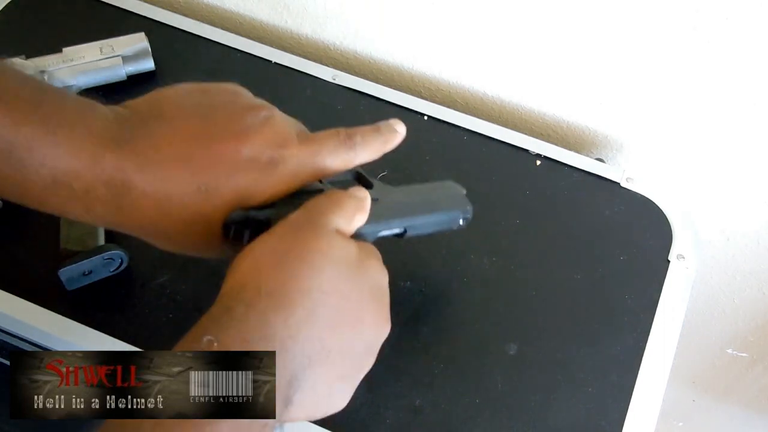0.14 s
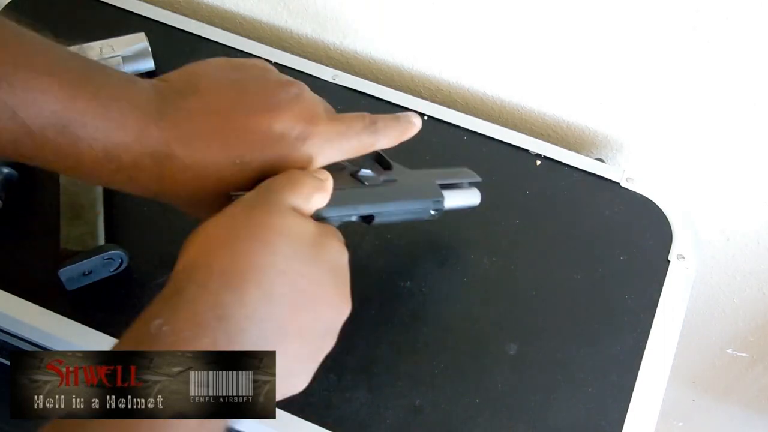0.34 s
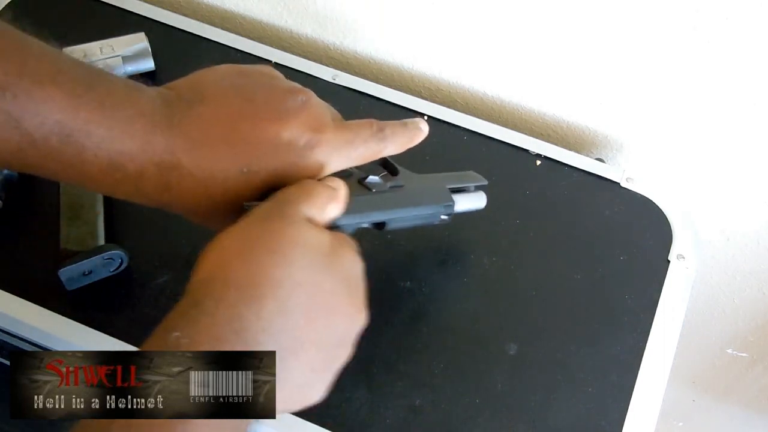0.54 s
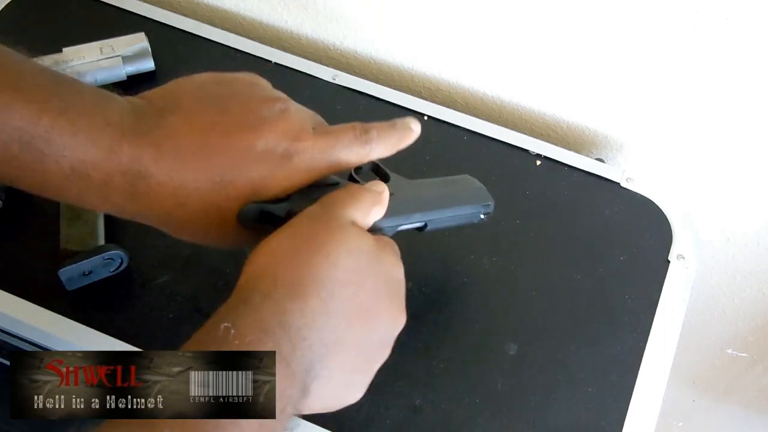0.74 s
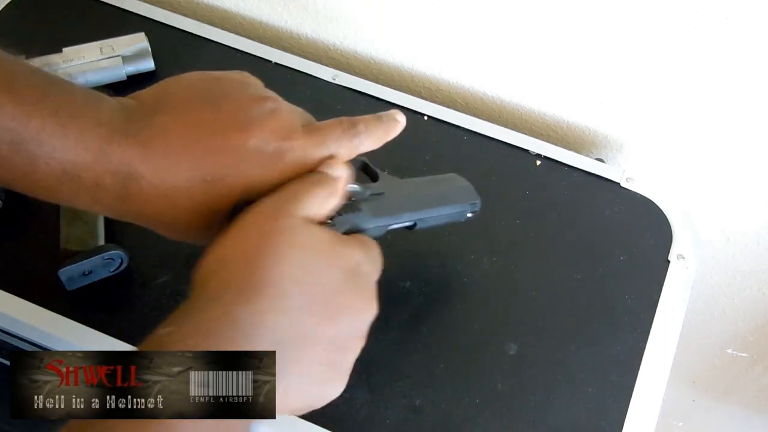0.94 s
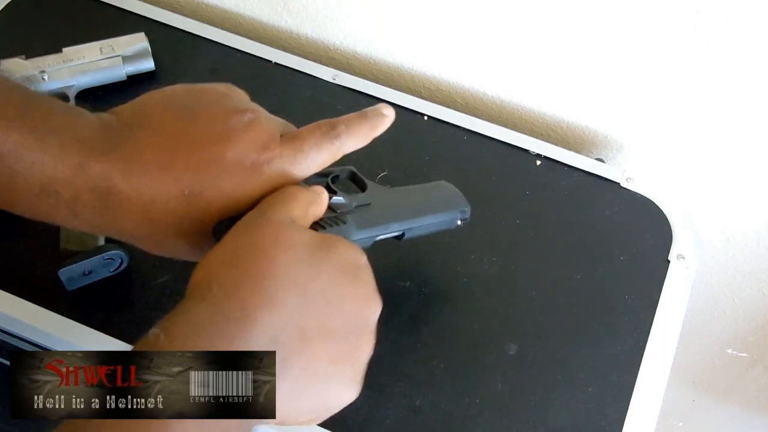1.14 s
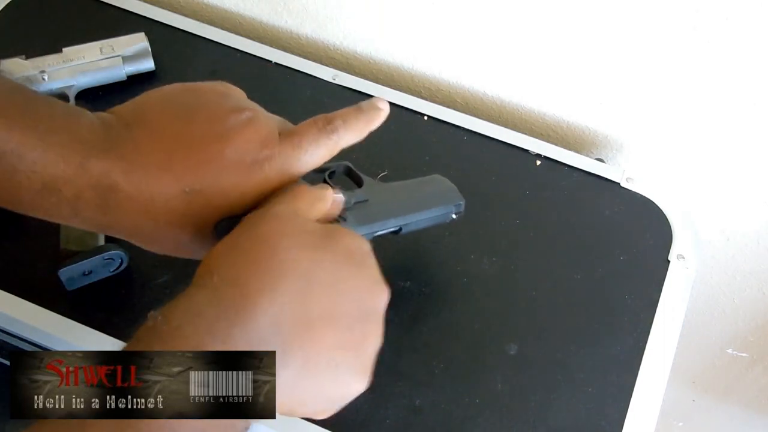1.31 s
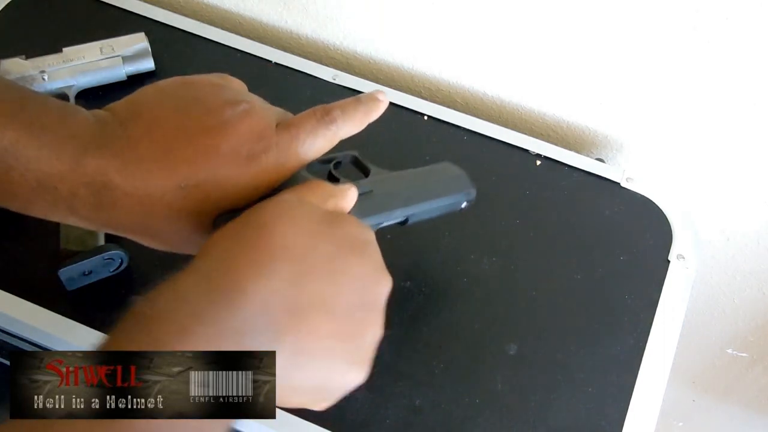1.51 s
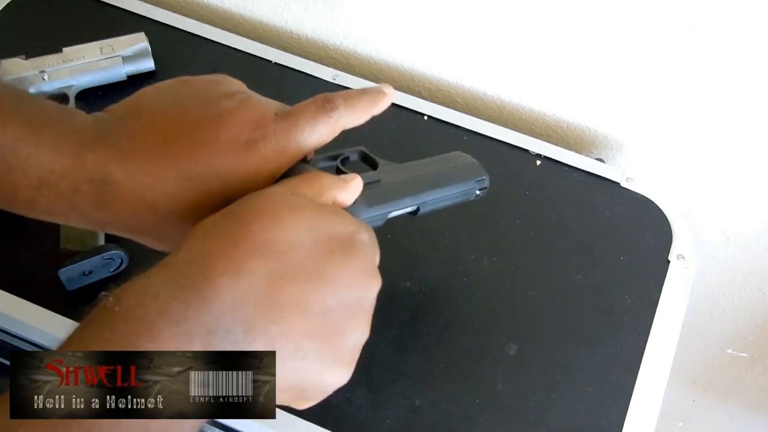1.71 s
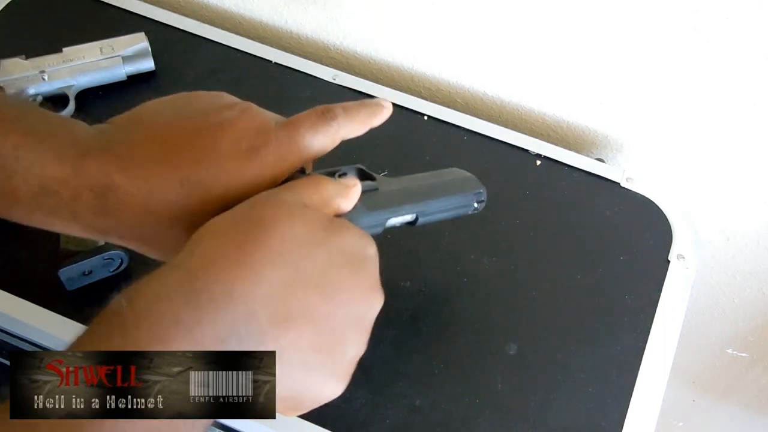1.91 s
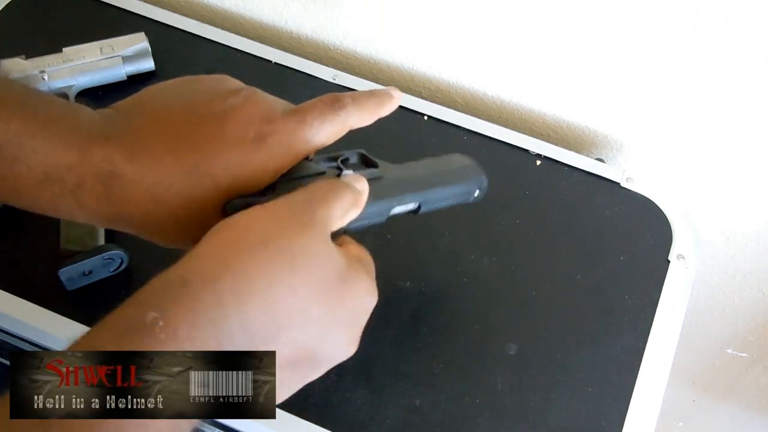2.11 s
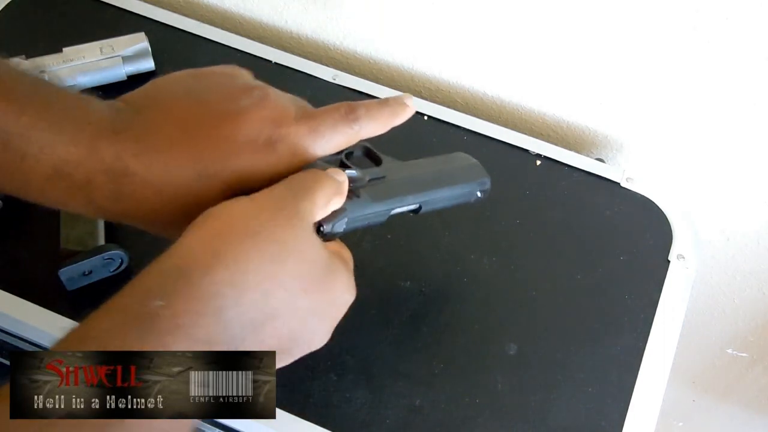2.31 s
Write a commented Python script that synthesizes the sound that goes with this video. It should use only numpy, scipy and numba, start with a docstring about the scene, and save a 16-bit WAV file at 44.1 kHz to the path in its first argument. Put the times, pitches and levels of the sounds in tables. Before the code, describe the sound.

A handgun slide is pulled back, caught and slammed home in bright steel clacks with brief scraping, then soft handling and light clicks, close to the microphone in a small live room with a low hum.

```python
"""A pistol slide is pulled back, caught and let fly home, heard close by in a small room over a low hum.
First come steel contacts, each a short crack that rings slide, spring and barrel; rails scrape in between.
The frame thuds in the hand under the hard blows, and the closing slide pushes a puff of air. Then the hold
shifts softly and light clicks follow, one leaving a faint ring. Reflections and a decaying tail form the
room; a limiter flattens the hard blows, so the room swells up behind them."""
import sys
import numpy as np
from scipy import signal
from scipy.fft import rfft, irfft, next_fast_len
from scipy.io import wavfile
from scipy.ndimage import uniform_filter1d
from numba import njit

SR = 44100
rng = np.random.default_rng(int(sys.argv[2]) if len(sys.argv) > 2 else 0)


def store_wav(level_fs):
    """Save 16-bit WAV to argv[1]."""
    pcm = np.round(np.clip(np.atleast_2d(level_fs), -1, 1) * 32767)
    wavfile.write(sys.argv[1], SR, pcm.T.astype(np.int16))


N = 103635

LEAD = SR // 4  # samples ahead of the start, so that a sound may begin before it
T = np.arange(SR // 2) / SR  # seconds, the time axis of every single event
SIDES = np.array([[1], [-1]])  # sign of the side signal in the left and right channel

# Spectrum of steel meeting or rubbing steel. Each row: frequency in Hz, gain in dB.
STEEL_COLOUR = [(60, -10), (200, -8), (500, -12), (1000, -8.5), (2000, -4.5), (4000, -1), (6000, -2),
                (8300, 0.5), (11300, 1.5), (13500, -4.5), (16000, -17)]


def undb(db):
    """Amplitude ratio: twenty decibels make a factor of ten."""
    return 10 ** (np.asarray(db) / 20)


def curve(points, size):
    """Interpolation over log frequency: a table read at the bins of a transform."""
    p = np.array(points, float)
    hz = np.arange(size // 2 + 1) * SR / size
    return np.interp(np.log(hz + 1), np.log(p[:, 0]), p[:, 1])


def colour(x, points):
    """Minimum-phase filtering: folding the cepstrum makes the given (Hz, dB) response causal."""
    size = next_fast_len(x.shape[-1] // 2 + 2048) * 2
    cepstrum = irfft(np.log(undb(curve(points, size))))
    cepstrum[1:size // 2] *= 2
    cepstrum[size // 2 + 1:] = 0
    response = np.exp(rfft(cepstrum))
    return irfft(rfft(x, size) * response)[..., :x.shape[-1]]


def tone(x, bass_db, middle_db):
    """Spectral balance: bass and middle are lifted or cut against the treble."""
    bass_edge, treble_edge = 900, 4700  # Hz, each within a gradual slope
    slopes = [(bass_edge / 2, bass_db), (bass_edge * 2, middle_db),
              (treble_edge * 0.89, middle_db), (treble_edge * 2.04, 0)]
    return colour(x, slopes)


def add(track, s, x):
    """Superposition: a sound is mixed into the track at a time in seconds."""
    i = max(int(s * SR) + LEAD, 0)
    x = x[:len(track) - i]
    track[i:i + len(x)] += x


def ring(modes):
    """Modal vibration: decaying sines, with pitch slightly varied and phase drawn anew at each blow."""
    out = np.zeros(len(T))
    for hz, db, t60 in modes:
        varied_hz = hz * (1 + 0.0005 * rng.standard_normal())
        sine = np.sin(2 * np.pi * (varied_hz * T + rng.random()))
        out += undb(db) * sine * undb(-60 * T / t60)
    return out


def crack(shade, bass_db, middle_db, decay_ms):
    """Impact noise: a few milliseconds of chatter as two faces meet, rising fast and dying exponentially."""
    attack_ms = 0.85
    ms = T * 1000
    envelope = (1 - np.exp(-ms / attack_ms)) * np.exp(-ms / decay_ms)
    burst = rng.standard_normal(len(ms)) * envelope
    return tone(colour(burst, shade), bass_db, middle_db)


def background():
    """Stationary noise and steady tones: low room rumble, faint hiss and an appliance hum."""
    # Spectrum of the rumble and hiss. Each row: frequency in Hz, gain in dB.
    air_colour = [(15, -22.5), (25, 4), (92, -2), (123, -4), (326, -20), (384, -17.5), (416, -22),
                  (936, -24.5), (1230, -27), (1520, -30.5), (7510, -40), (14400, -40), (16000, -48)]
    # Stereo width of the air. Each row: frequency in Hz, side gain in dB.
    air_width = [(30, -12), (120, -6), (400, -6), (1500, -2), (8000, 0)]
    # Tones of the hum. Each row: frequency in Hz, RMS level in dB.
    hum_tones = [(120, -49), (142, -54), (380, -63)]
    air_db = -44.5
    t = np.arange(N) / SR
    mid, side = colour(rng.standard_normal((2, N)), air_colour)
    air = (mid + colour(side, air_width) * SIDES) * undb(air_db) / mid.std()
    hum = np.zeros(N)
    for hz, db in hum_tones:
        hum += undb(db) * np.sqrt(2) * np.sin(2 * np.pi * (hz * t + rng.random()))
    return air + hum


def clacks():
    """Impact excitation: each steel contact is a crack of noise and sets the modes of three parts ringing."""
    # Steel contacts. Each row: start in seconds, level in dB, bass in dB, middle in dB,
    # decay time constant in ms, spring ring in dB, barrel ring in dB.
    contacts = [(-.075, -4.5, 11.5, 2.5, 6.3, -37, -2.5), (0.1679, -30, 3.5, 15, 4.4, -21.5, -32),
                (.196, -24, -13, 6, 6.6, -25, -8), (.211, -15, -10.5, 5.5, 4.3, -25, -2),
                (0.2249, -12, -16, 1, 4.4, -21.5, -6), (0.2446, -9, -18, -7.5, 5.3, -22, -28),
                (.283, -8.5, 2.5, -2, 13.7, 5, -6.5), (0.304, -20.5, -9.5, 12, 2.9, 4.5, -17),
                (0.3192, -13.5, 2, -2.5, 4.6, 7.5, -20), (0.443, -10.5, 9.5, -1, 4.9, -25.5, -8),
                (.450, -5, -2, 1.5, 8.9, -11, 5.5), (.476, -15.5, 0.5, -3.5, 4, -18.5, -16),
                (.484, -7.5, -11.5, -5.5, 4.4, -15, -17), (0.502, -18.5, -2.5, -2.5, 2.4, -9, -10),
                (0.5352, 1.5, -2.5, -0.5, 6.6, -15.5, -4.5), (0.7551, -22, -3, 12.5, 4.1, -26, -8),
                (.767, -17.5, 4.5, 0.5, 5.7, -22, -12.5), (.7872, -9.5, -12, -1.5, 6.9, -19.5, -23.5),
                (0.8139, -11, -14, -14.5, 8, -4, -16), (0.8373, 4.5, 0, -2.5, 22.4, -21, -25),
                (0.861, 3.5, -1, -6.5, 23.3, -5, -16), (.886, 0, -5.5, -6.5, 25.4, -23, -26)]
    # Modes of the parts. Each row: frequency in Hz, relative level in dB, t60 in seconds.
    slide_modes = [(3124, -11, 0.26), (4330, -1.5, .15), (4526, -14, 0.36), (6530, 4.5, 0.14),
                   (8730, -1.5, 0.094), (9700, -6, 0.033), (10840, 4.5, 0.12), (11200, -6, 0.08),
                   (15000, -4.5, 0.087)]
    spring_modes = [(8145, -3, .06), (8204, 0, .075), (8278, -2, .06), (8346, -4, .06), (8615, -9, .05),
                    (15200, -14, .06)]
    barrel_modes = [(7780, -10, 0.15), (8100, -5, .05), (7667, -1.5, 0.076), (7980, -9.5, .05),
                    (14650, -7.5, .07)]
    slide_gain_db, spring_gain_db, barrel_gain_db = -22.5, -7, -4.5
    out = np.zeros(N + LEAD)
    for s, db, bass_db, middle_db, decay_ms, spring_db, barrel_db in contacts:
        rings = undb(slide_gain_db) * ring(slide_modes)
        rings += undb(spring_gain_db + spring_db) * ring(spring_modes)
        rings += undb(barrel_gain_db + barrel_db) * ring(barrel_modes)
        add(out, s, undb(db) * (crack(STEEL_COLOUR, bass_db, middle_db, decay_ms) + rings))
    return out


def room(x, tail_db, early_side_db):
    """Reverberation: direct sound, quick reflections off table and hands, a diffuse tail decaying by pitch."""
    # Reverberation time. Each row: frequency in Hz, t60 in seconds.
    reverb_time = [(250, 0.37), (800, 0.35), (2000, 0.42), (4300, 0.44), (8000, 0.4), (11000, 0.3),
                   (15000, 0.23)]
    # Spectrum of the tail. Each row: frequency in Hz, gain in dB.
    tail_colour = [(100, -2.5), (500, -11), (1200, 2.5), (2500, 2), (4500, 4), (8000, 1), (11000, 4),
                   (15500, 3.5)]
    # Stereo balance as heard: wide below about 5 kHz, narrower above it.
    # Each row: frequency in Hz, gain of the side signal in dB.
    early_balance = [(200, 2), (1000, 0), (4200, -3), (5500, -5), (9000, -3), (15000, -4)]
    tail_balance = [(200, -2), (1200, -1), (4200, 0), (5500, -15), (15000, -17)]
    onset_s, early_db, early_s = 0.0013, -5, 0.0036

    # the energy in each band is smeared over time by that band's decay
    size = 256
    power = np.abs(signal.stft(x, nperseg=size)[2]) ** 2
    t = np.arange(SR // size * 2) * size / 2 / SR
    onset = 1 - np.exp(-(t / onset_s) ** 2)
    fade = (undb(-60 * t / curve(reverb_time, size)[:, None]) * onset) ** 2
    fade /= fade.sum(axis=1).mean()
    energy = signal.fftconvolve(power, fade, axes=1)[:, :power.shape[1]]

    # noise takes on that energy
    noise = signal.stft(rng.standard_normal((2, len(x))), nperseg=size)[2]
    shading = undb(curve(tail_colour, size))[:, None]
    tail = signal.istft(noise / noise.std() * np.sqrt(np.abs(energy)) * shading)[1]
    tail_mid, tail_side = undb(tail_db) * tail[:, :len(x)]

    # early reflections: a dense noise impulse response that swells until early_s / 2, then dies away
    t = np.arange(SR // 30) / SR
    early = rng.standard_normal((2, len(t))) * t * np.exp(-2 * t / early_s)
    early /= np.linalg.norm(early[0])
    near_mid, near_side = undb(early_db) * signal.fftconvolve(x[None], early, axes=1)[:, :len(x)]

    mid = x + near_mid + tail_mid
    side = colour(tail_side, tail_balance) + undb(early_side_db) * colour(near_side, early_balance)
    return (mid + SIDES * side)[:, LEAD:]


def scrapes():
    """Sliding friction: noise whose strength fluctuates as steel and hands catch on rough surfaces."""
    # Steel on steel and hands on the grip.
    # Each row: start in seconds, length in seconds, level in dB, middle in dB.
    slides = [(0.181, 0.097, -31, 6), (0.436, 0.16, -21, 0.5), (.764, 0.08, -26.5, 7.5),
              (1.274, 0.21, -63.5, -1.5), (1.846, 0.138, -72, 15), (2.136, 0.19, -67, 14.5)]
    grain, fade_s = 0.76, 0.0049  # grain: spread of the log amplitude
    out = np.zeros(N + LEAD)
    for s, length, db, middle_db in slides:
        coarse_t = T[::64]
        catches = np.exp(grain * np.interp(T, coarse_t, rng.standard_normal(len(coarse_t))))
        catches /= np.sqrt(np.mean(catches ** 2))
        grit = colour(rng.standard_normal(len(T)) * catches, STEEL_COLOUR)
        envelope = np.clip(np.minimum(T, length - T) / fade_s, 0, 1)
        add(out, s, undb(db) * tone(grit, bass_db=-11.5, middle_db=middle_db) * envelope)
    return out


def thuds():
    """Damped impact: the frame meets the palm in a dull, quickly dying burst under the hard blows."""
    # Blows. Each row: start in seconds, level in dB.
    blows = [(.284, -32), (.449, -18), (.5355, -12), (.839, -3), (0.867, -12.5)]
    # Spectrum of a thud. Each row: frequency in Hz, gain in dB.
    thud_colour = [(60, -6), (170, 3), (300, 1), (550, 2), (850, -6.5), (1400, -19.5), (5000, -43.5)]
    decay_s = 0.0059
    out = np.zeros(N + LEAD)
    for s, db in blows:
        burst = rng.standard_normal(len(T)) * np.exp(-T / decay_s)
        add(out, s, undb(db) * colour(burst, thud_colour))
    return out


def puff():
    """Air displacement: the jolt of the closing slide pushes one slow pressure pulse at the microphone."""
    centre_s, width_s, highpass_hz = .851, .0035, 9
    level_db, pan_db = -3.5, -4  # pan: left against right
    t = np.arange(N) / SR
    push = -undb(level_db) * np.exp(-.5 * ((t - centre_s) / width_s) ** 2)
    highpass = signal.butter(2, highpass_hz, "high", fs=SR, output="sos")
    return signal.sosfilt(highpass, push) * undb(SIDES * pan_db / 2)


def shifts():
    """Soft contact noise: the hands shift their hold in a low rumble that swells and sinks."""
    # Shifts of the hold. Each row: centre in seconds, half length in seconds, level in dB.
    moves = [(1.03, .045, -37), (2.181, .055, -43)]
    # Spectrum of the rumble. Each row: frequency in Hz, gain in dB.
    shift_colour = [(30, -2.5), (80, 2), (140, 4), (250, -20.5), (500, -18), (900, -39), (4000, -71.5)]
    out = np.zeros(N + LEAD)
    for s, half, db in moves:
        rumble = colour(rng.standard_normal(len(T)), shift_colour)
        swell = np.exp(-(T / half - 2) ** 2)  # peaks two half lengths in
        add(out, s - 2 * half, undb(db) * rumble / rumble.std() * swell)
    return out


def levers():
    """Impact on light parts: short clicks of lever and grip with modes that die quickly."""
    # Clicks. Each row: start in seconds, level in dB, bass in dB, middle in dB, decay time constant in ms.
    clicks = [(1.2492, -35, 13, 9, 0.99), (1.53, -26.5, -6, -1.5, 2.6), (1.5323, -12, -17, -2, 2.94),
              (1.5361, -14, -11, -4, 1.9), (2.1314, -34, 0, 12.5, 2.5), (2.2599, -47, 22, 18, 2.3)]
    # Spectrum of a click. Each row: frequency in Hz, gain in dB.
    click_colour = [(200, -4), (600, -12), (950, 7), (1400, -3), (2400, 6), (3300, 1), (4900, 6),
                    (6200, 2.5), (8000, 3.5), (11000, 6), (13500, -3), (16000, 0)]
    # Modes of the small parts. Each row: frequency in Hz, relative level in dB, t60 in seconds.
    lever_modes = [(908, -10, 0.11), (970, -9.5, .06), (1100, -15.5, 0.022), (1668, -7, 0.027),
                   (2426, -3, .02), (4910, 5, 0.021)]
    lever_db = -18.5
    out = np.zeros(N + LEAD)
    for s, db, bass_db, middle_db, decay_ms in clicks:
        click = crack(click_colour, bass_db, middle_db, decay_ms)
        add(out, s, undb(db) * (click + undb(lever_db) * ring(lever_modes)))
    return out


def frame():
    """Free vibration: the frame rings on faintly after the last firm click."""
    # Modes of the frame. Each row: frequency in Hz, relative level in dB, t60 in seconds.
    frame_modes = [(490, 2, .4), (2820, -5, .4), (3330, -2, .7), (3820, -2, .6), (4020, -4, .5),
                   (4400, -3, .6), (4580, 0, .7)]
    start_s, level_db = 2.132, -56.5
    out = np.zeros(N + LEAD)
    add(out, start_s, undb(level_db) * ring(frame_modes))
    return out


def scene():
    """Superposition: the slide in a live room, the lesser sounds in a drier one, the puff and the background."""
    slide = room(clacks() + scrapes(), tail_db=-7.5, early_side_db=-2)
    handling = room(thuds() + shifts() + levers() + frame(), tail_db=-17.5, early_side_db=1)
    return slide + handling + puff() + background()


@njit
def follow(x, release):
    """Peak detection: a level that jumps up at once and sinks back exponentially."""
    out, e = np.empty(len(x)), 0.
    for i in range(len(x)):
        e = max(x[i], e + (x[i] - e) * release)
        out[i] = e
    return out


def record(dry):
    """Dynamic compression: a fast limiter, peaks rounded by saturation, and a steep top cut."""
    threshold_db, ratio, window_s, release_s = -8, 16, .002, 0.058
    ceiling, top_hz = .9, 15900
    power = uniform_filter1d(np.mean(dry ** 2, axis=0), max(int(window_s * SR), 1))
    level = follow(np.sqrt(np.abs(power)), 1 / (release_s * SR))
    gain = np.maximum(level / undb(threshold_db), 1) ** (1 / ratio - 1)
    wet = ceiling * np.tanh(dry * gain / ceiling)
    return signal.sosfilt(signal.ellip(10, .2, 70, top_hz, fs=SR, output="sos"), wet)


dry = scene()
out = record(dry)
store_wav(out)
```